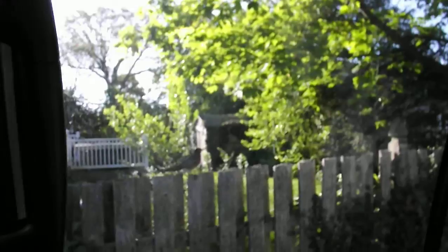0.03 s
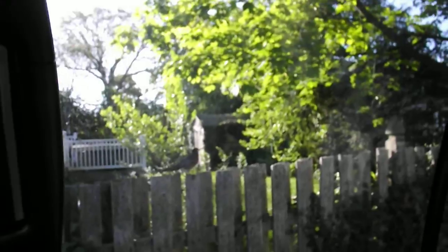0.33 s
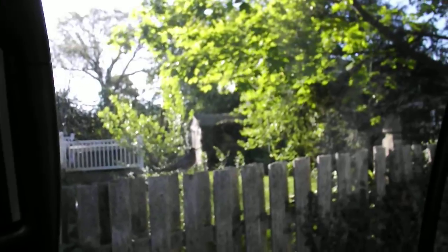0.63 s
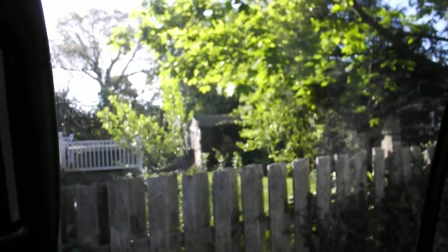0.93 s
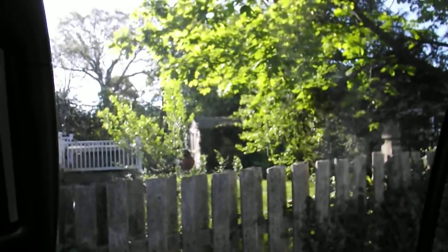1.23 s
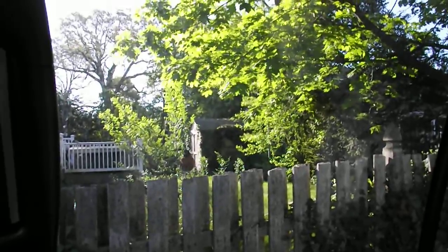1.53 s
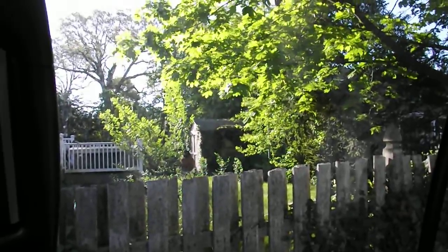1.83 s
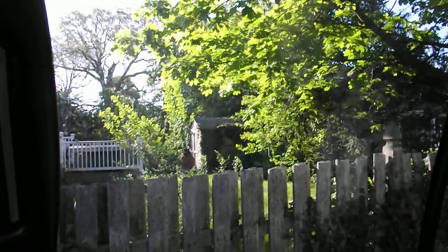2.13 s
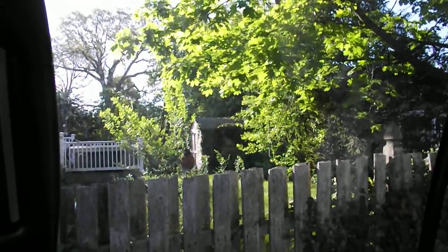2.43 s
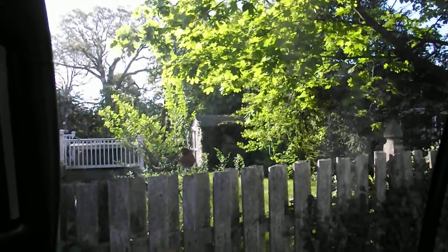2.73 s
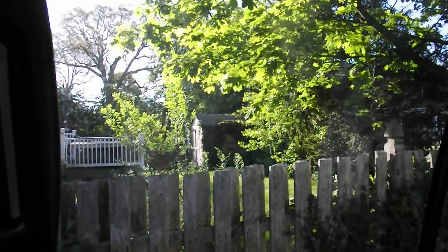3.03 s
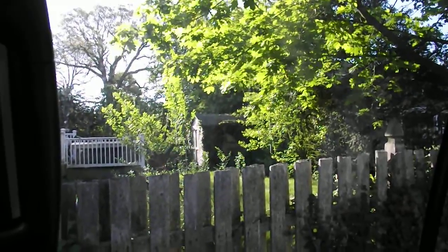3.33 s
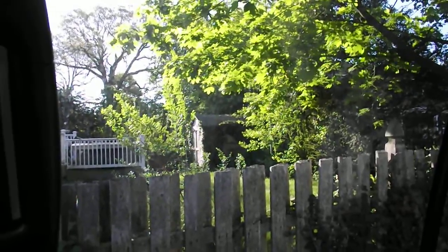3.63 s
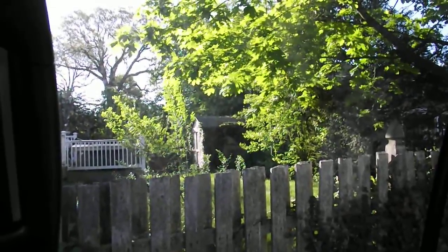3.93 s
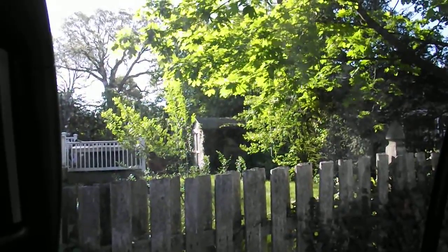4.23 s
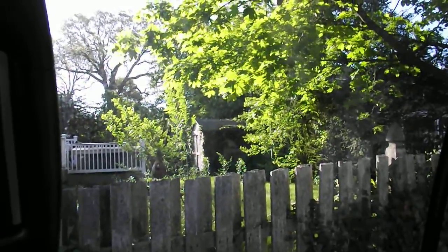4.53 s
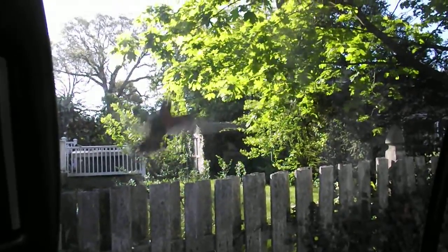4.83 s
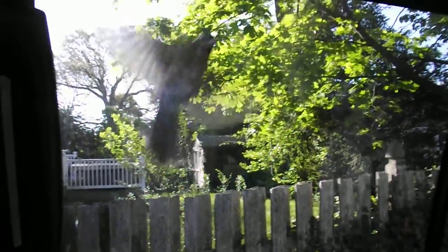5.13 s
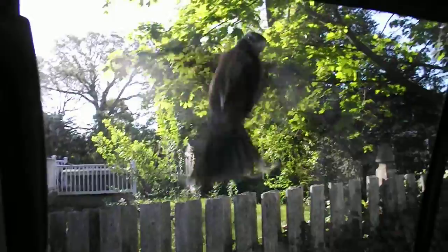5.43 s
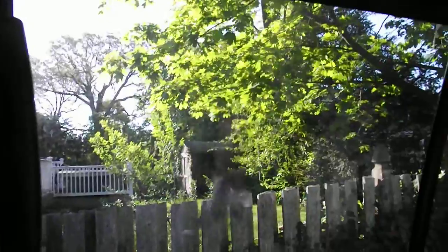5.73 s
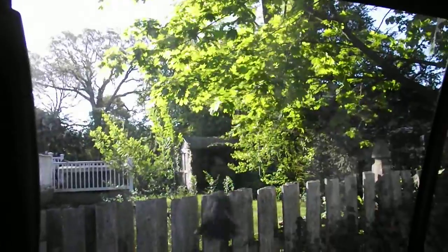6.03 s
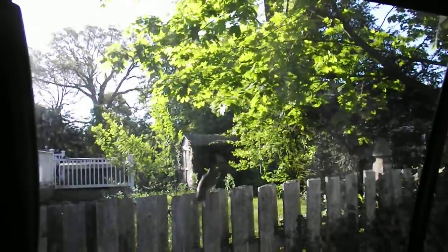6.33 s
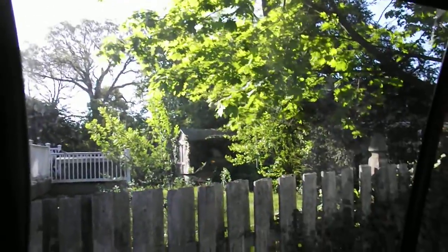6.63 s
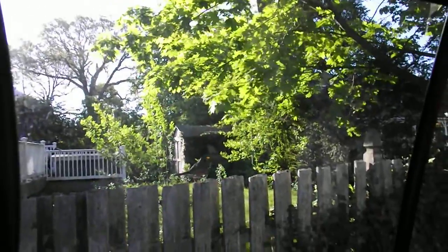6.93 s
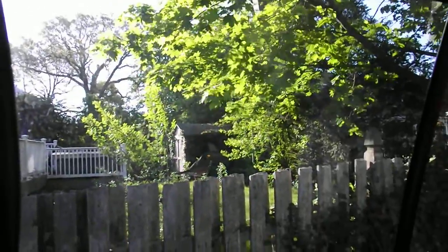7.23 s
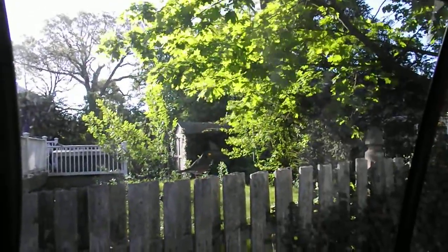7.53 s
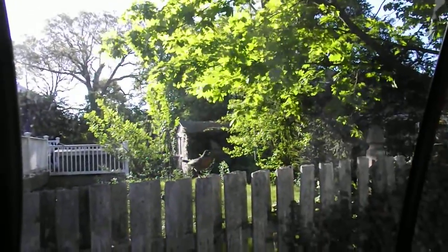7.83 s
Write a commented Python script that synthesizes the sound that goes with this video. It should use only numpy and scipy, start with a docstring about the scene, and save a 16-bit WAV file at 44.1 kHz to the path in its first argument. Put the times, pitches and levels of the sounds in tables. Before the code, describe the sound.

A bird thumps a car window once and briefly scratches down the glass, over a low idling engine and faint handling clicks.

```python
"""A bird flies into the window of a parked car, heard from inside: it thumps the pane once and slides
down the glass, its feathers scratching and squeaking with each wingbeat. A six-cylinder engine idles
throughout, three firings a turn booming in the cabin, its speed hunting a little under a faint fan hiss.
The plastic case of a hand-held camera creaks, clicks and knocks faintly, and a sleeve rustles."""
import sys
import numpy as np
from scipy import signal
from scipy.fft import rfft, irfft
from scipy.io import wavfile
from scipy.ndimage import uniform_filter1d

SR = 44100
rng = np.random.default_rng(int(sys.argv[2]) if len(sys.argv) > 2 else 0)


def inscribe(sig):
    """Save sig as 16-bit PCM at rate SR to the path in sys.argv[1].

    A 1-D sig is mono; a 2-D sig holds one channel per row.
    Samples are clipped to [-1, 1] before scaling.
    """
    pcm = np.round(np.clip(np.atleast_2d(sig).T, -1, 1) * 32767)
    wavfile.write(sys.argv[1], SR, pcm.astype(np.int16))


N = 347067
T = np.arange(N) / SR


def amp(db):
    """Decibels to gain."""
    return 10 ** (np.asarray(db) / 20)


def unit(x):
    """Scale to rms 1."""
    return x / np.sqrt(np.mean(x ** 2))


def colour(x, outline):
    """Filter by a (Hz, dB) outline, falling steeply beyond its ends."""
    hz, db = np.transpose(outline)
    log_hz = np.log(np.maximum(np.fft.rfftfreq(len(x), 1 / SR), 1))
    beyond = np.maximum(log_hz - np.log(hz[-1]), 0) + np.maximum(np.log(hz[0]) - log_hz, 0)
    return irfft(rfft(x) * amp(np.interp(log_hz, np.log(hz), db) - 69 * beyond), len(x))


def noise(outline):
    """Coloured noise of rms 1."""
    return unit(colour(rng.standard_normal(N), outline))


def walk(rate_hz):
    """Smooth random drift of rms 1."""
    hold = int(SR / rate_hz)
    steps = np.repeat(rng.standard_normal(N // hold + 1), hold)
    return unit(uniform_filter1d(uniform_filter1d(steps, hold), hold)[:N])


def swell(middle_s, length_s):
    """Bell-shaped envelope."""
    return np.exp(-np.minimum((2 * (T - middle_s) / length_s) ** 2, 20))


def swells(rows):
    """Summed envelope of (middle s, length s, dB) bursts."""
    return sum(amp(db) * swell(middle_s, length_s) for middle_s, length_s, db in rows)


def add(out, start_s, x):
    """Mix x into out."""
    i = int(start_s * SR)
    out[i:i + len(x)] += x[:N - i]


def resonate(x, modes):
    """Pass x through parallel (Hz, width Hz, dB) resonances of alternating sign."""
    return sum((-1) ** k * amp(db) * signal.lfilter(*signal.iirpeak(hz, hz / width_hz, fs=SR), x)
               for k, (hz, width_hz, db) in enumerate(modes))


# Spectra of fan air and fine hiss. Each row: frequency in Hz, relative density in dB.
AIR_SPECTRUM = [(100, 0.5), (170, 2), (270, 0.5), (330, -6), (420, -6.5), (640, -15), (860, -21),
                (1250, -20), (1900, -16.5), (2150, -16), (2420, -9), (2700, -15), (2950, -15), (3600, -25),
                (4800, -35)]
HISS_SPECTRUM = [(2500, -12.5), (5000, -1), (8000, -0.5), (12000, -1.5), (16000, -5.5)]
# Duct resonances. Each row: frequency in Hz, width in Hz, relative gain in dB.
DUCT_MODES = [(278, 14, 7.5), (603, 24, -1.5), (693, 40, -6.5), (1050, 110, -13), (1355, 36, -8),
              (1576, 36, -11), (1858, 100, -4.5), (2396, 58, 2.5), (2610, 51, -8.5), (2870, 70, -2.5),
              (3130, 110, -8), (3480, 130, -16), (3797, 57, -12), (4380, 250, -20.5), (5970, 320, -25.5)]


def fan(air_db=-45.5, waver_db=0.75, duct_db=-52, hiss_db=-63.5):
    """Fan air rushes and sings in the ducts, with a fine hiss on top."""
    air = noise(AIR_SPECTRUM) * amp(air_db + waver_db * walk(15))
    duct = unit(resonate(rng.standard_normal(N), DUCT_MODES)) * amp(duct_db)
    return air + duct + noise(HISS_SPECTRUM) * amp(hiss_db)


# Swells of the rush. Each row: middle in seconds, length in seconds, level in dB.
RUSH_SWELLS = [(3.72, 0.86, -56), (5.85, .4, -75)]
# Its spectrum. Each row: frequency in Hz, relative density in dB.
RUSH_SPECTRUM = [(400, -5), (600, -2.5), (720, -4.5), (795, 2.5), (870, -9.5), (1100, -12)]


def hollow_rush(rest_db=-72.5):
    """A soft hollow rush swells and fades."""
    return noise(RUSH_SPECTRUM) * (amp(rest_db) + swells(RUSH_SWELLS))


# Body shake and cabin rumble. Each row: frequency in Hz, relative density in dB.
RUMBLE_SPECTRUM = [(4, -17.5), (9, -7.5), (14, -16), (19, 5.5), (27, -27), (40, -14), (60, -18),
                   (80, -15.5), (110, -28.5), (160, -46.5), (250, -60)]


def body_rumble(level_db=-25, surge_db=0.5, shake_top_hz=30):
    """The car body rumbles; its deepest shake comes in surges."""
    rumble = noise(RUMBLE_SPECTRUM) * amp(level_db)
    shake = signal.sosfilt(signal.butter(1, shake_top_hz, fs=SR, output="sos"), rumble)
    return rumble + shake * (amp(surge_db * walk(4)) - 1)


# Idle sags. Each row: middle in seconds, length in seconds, crank speed lost in Hz.
IDLE_SAGS = [(1.324, 1.02, 1.75), (3.643, .82, 1.65), (5.525, 0.753, 0.758), (7.099, 2, 1)]
# Engine tones. Each row: multiple of crank speed, relative level in dB, dB added per Hz above mean speed.
ENGINE_ORDERS = [(1, -3, 2.5), (2, -16.5, 9.5), (3, 1, 0), (4, -16.5, -3), (5, -30.5, -1.5), (6, -32, -1.5),
                 (7, -50, 4.5), (8, -37.5, 2.5), (12, -44.5, -0.5)]


def engine(idle_hz=24.37, boom_db=-17, boom_db_per_hz=0.77, pulley_ratio=4 / 3, lurch_rad=0.0099):
    """Firing, unbalance and belt pulley tones boom in the cabin, louder as the idle speeds up."""
    crank_hz = idle_hz - sum(loss_hz * swell(s, length_s) for s, length_s, loss_hz in IDLE_SAGS)
    above_hz = crank_hz - crank_hz.mean()
    burn = walk(24)  # each turn burns stronger or weaker and nudges the crank
    crank_rad = 2 * np.pi * np.cumsum(crank_hz) / SR + lurch_rad * burn
    pulley_rad = pulley_ratio * crank_rad
    tones = amp(-18 + 2 * walk(3.4)) * np.sin(pulley_rad)
    tones += amp(-24 + 2 * walk(3.2)) * np.sin(2 * pulley_rad)  # throbs against the firing tone
    for order, db, db_per_hz in ENGINE_ORDERS:
        tone_db = db + db_per_hz * above_hz + 0.38 * walk(11)
        tones += amp(tone_db) * np.sin(order * crank_rad + rng.uniform(0, 2 * np.pi))
    level_db = boom_db + boom_db_per_hz * above_hz + 0.17 * burn + 0.5 * walk(4.79)
    return np.sqrt(2) * tones * amp(level_db)


# Sleeve rustles. Each row: middle in seconds, length in seconds, gain in dB.
RUSTLES = [(2.688, 0.024, -43), (3.682, 0.057, -48.5), (3.995, 0.085, -51), (4.51, 0.065, -46),
           (7.64, 0.055, -52)]
# Cloth spectrum. Each row: frequency in Hz, relative density in dB.
CLOTH_SPECTRUM = [(1000, -11), (2000, -3), (3000, 7.5), (3600, -11), (4100, -5.5), (4700, -16), (7000, -23),
                  (12000, -35.5)]


def sleeve(grain_db=3):
    """Cloth slides softly as the arm shifts."""
    return swells(RUSTLES) * noise(CLOTH_SPECTRUM) * amp(grain_db * (walk(500) - 0.5))


# Camera case resonances. Each row: frequency in Hz, width in Hz, gain in dB.
CASE_MODES = [(214, 31, 4.5), (292, 76, -0.5), (694, 100, -10), (925, 70, -7.5), (1130, 96, -5),
              (1390, 200, -3), (1980, 370, -3.5), (2320, 223, 4.5), (3000, 336, 6.5), (3155, 600, 0)]


def camera_case(force):
    """The plastic case rings under a force."""
    return resonate(force, CASE_MODES)


def judder(bursts, tilt_db, slip_rate_hz=2200, scatter_db=1, rub=0.13):
    """Dense little slips jolt the case in (middle s, length s, dB) bursts; negative tilt dulls them."""
    t, out = T[:SR // 4], np.zeros(N)
    centre_s = t[-1] / 2
    outline = [(170, 0), (600, 0), (3300, 2.5 * tilt_db),
               (5000, 3 * tilt_db - 6), (16000, 3 * tilt_db - 12)]
    for middle_s, length_s, db in bursts:
        pressure = np.exp(-(2 * (t - centre_s) / length_s) ** 4)
        slips = (rng.random(len(t)) < slip_rate_hz / SR) * amp(scatter_db * rng.standard_normal(len(t)))
        force = pressure * (slips - slips.mean() + rub * rng.standard_normal(len(t)))
        body = unit(colour(camera_case(force), outline))
        add(out, middle_s - centre_s, amp(db) * body * np.sqrt(np.mean(pressure ** 2)))
    return out


# Soft knocks. Each row: middle in seconds, length in seconds, level in dB.
KNOCKS = [(.8215, 0.0035, -39), (.8855, 0.0042, -34.5), (.894, 0.0034, -34), (.956, 0.011, -39),
          (.99, .01, -35), (1.021, 0.017, -35.5), (1.081, 0.014, -37), (1.183, 0.014, -40),
          (1.2535, 0.0075, -34.5), (1.3195, 0.01, -34), (1.333, 0.0066, -36), (1.3885, 0.0061, -35)]


def camera_knocks():
    """Dull judders inside the camera, like a lens stepping into focus."""
    return judder(KNOCKS, tilt_db=-9)


# Grip creaks. Each row: middle in seconds, length in seconds, level in dB, relative grit level in dB.
CREAKS = [(0.643, 0.017, -42, -6.5), (0.95, 0.014, -37.5, -16), (0.9824, .005, -37, -14),
          (0.986, 0.0051, -32, -19), (1.012, 0.013, -35, -15), (1.024, 0.011, -29.5, -19),
          (1.1085, 0.0099, -35, -19)]
# Rubbing plastic. Each row: frequency in Hz, relative density in dB.
GRIT_SPECTRUM = [(3000, -1), (4000, 5), (4900, -14), (6800, -15), (8000, -22), (10000, -19), (12000, -29)]


def grip_creaks():
    """The grip sticks and slips on the plastic, with a little grit on top."""
    body = judder([(s, length_s, db) for s, length_s, db, _ in CREAKS], tilt_db=-0.5)
    grit_gain = swells([(s, length_s, db + grit_db) for s, length_s, db, grit_db in CREAKS])
    return body + grit_gain * noise(GRIT_SPECTRUM)


# Camera clicks. Each row: start in seconds, level over the first 5 ms in dB, ring in Hz, its t60 in
# seconds, ring and edge gains in dB re twice the snap's peak, snap's low cutoff as a share of ring Hz.
CLICKS = [(0.1645, -33, 1700, .026, -12, -33, 0.25), (.186, -48, 1800, 0.018, -15, -24, .3),
          (0.82, -41.5, 1450, .015, -12, -30, .15), (0.991, -29.5, 3080, .012, -18, -24, .25),
          (1.012, -28.5, 3020, .014, -12, -23, .3), (1.0203, -28.5, 2360, 0.015, -10, -25, 0.28),
          (1.0262, -28, 2900, 0.016, -11, -26, 0.28), (1.032, -33, 3060, .012, -8, -25, 0.27),
          (1.0956, -30.5, 2100, .013, -14, -30, .15), (1.1143, -36, 2400, .015, -15, -26, 0.37),
          (1.1342, -38.5, 2300, .015, -14, -22, .4), (1.2877, -37, 1720, .02, -6, -30, .4),
          (1.3048, -30, 2360, .017, -10, -10, 0.14), (1.331, -22.5, 2350, 0.022, -4, -11.5, 0.11),
          (2.678, -47, 3600, .01, -16, -9, 0.72), (2.9427, -24.5, 2430, 0.03, -13, -24, 0.61),
          (3.391, -38.5, 1130, 0.016, -20, -22, 0.44), (3.961, -44.5, 2220, .02, -10, -28, .35),
          (4.4805, -41, 2210, 0.018, -13, -16, .7), (4.6252, -44, 3420, .012, -12, -11, 0.41),
          (4.675, -49, 1010, .02, -15, -22, .55), (4.841, -43, 2940, 0.014, -18, -15, 0.19)]
# Hard edge of a snap. Each row: frequency in Hz, relative density in dB.
EDGE_SPECTRUM = [(3000, 2), (4000, 1), (4800, 5.5), (6500, -2), (8500, -7.5), (11000, -17), (15000, -20.5)]


def camera_clicks(rattle_t60_s=0.017, edge_t60_s=0.0056, rise_s=0.00071, bend=0.48, bend_s=0.00064):
    """A hard-edged snap rattles through the case; the treble arrives first, then one part rings."""
    t, out = T[:SR // 16], np.zeros(N)
    impulse = t == 0
    bent_s = t + bend * bend_s * (1 - np.exp(-t / bend_s))  # the ring starts sharp
    for start_s, db, hz, t60_s, ring_db, edge_db, low_share in CLICKS:
        jolt = impulse + 0.12 * rng.standard_normal(len(t)) * amp(-60 * t / rattle_t60_s)
        band = signal.butter(2, [low_share * hz, 1.6 * hz], "band", fs=SR, output="sos")
        snap = signal.sosfilt(band, camera_case(jolt))
        ring = amp(ring_db - 60 * t / t60_s) * (1 - np.exp(-t / rise_s)) * np.sin(2 * np.pi * hz * bent_s)
        spike = impulse + 0.3 * rng.standard_normal(len(t)) * amp(-60 * t / edge_t60_s)
        edge = colour(np.roll(spike, SR // 4000), EDGE_SPECTRUM)
        click = snap / np.abs(snap).max() + 2 * ring + 2 * amp(edge_db) * edge / np.abs(edge).max()
        add(out, start_s, amp(db) * click / np.std(click[:SR // 200]))
    return out


# Thin whistles. Each row: middle in seconds, length in seconds, pitch in Hz, level in dB.
WHISTLES = [(1.13, .07, 9900, -70), (1.553, 0.1, 3030, -54), (5.436, 0.01, 2920, -36),
            (5.452, .006, 2830, -39), (5.528, 0.02, 2840, -40), (5.545, 0.0071, 2840, -40),
            (5.86, 0.12, 665, -57.5), (6.545, .08, 1095, -59)]


def whistles(waver=0.02):
    """Short, unsteady whistles; those during the bird's slide are heard as squeaks."""
    rad_per_hz = 2 * np.pi * np.cumsum(1 + waver * walk(280)) / SR
    return sum(np.sqrt(2) * amp(db) * swell(middle_s, length_s) * np.sin(hz * rad_per_hz)
               for middle_s, length_s, hz, db in WHISTLES)


# Ticks on the glass. Each row: start in seconds, level in dB, centre in Hz, t60 in seconds.
TICKS = [(5.3628, -48, 6000, .008), (5.3655, -37, 3200, .01), (5.3662, -46, 9500, .016),
         (5.3826, -48, 5500, .009), (5.3868, -37, 6000, .003), (5.4352, -40, 2500, 0.011),
         (5.4482, -39, 2500, .01), (5.5030, -30, 1550, 0.0095)]


def beak_and_claws(width_share=0.58):
    """Each hard tip meets the glass with a tiny burst of treble."""
    t, out = T[:SR // 50], np.zeros(N)
    for start_s, db, hz, t60_s in TICKS:
        tip = [(hz, width_share * hz, 0)]
        burst = unit(resonate(resonate(rng.standard_normal(len(t)), tip), tip))
        add(out, start_s, amp(db - 60 * t / t60_s) * burst)
    return out


# Wing strokes and feather-tip flicks. Each row: middle in seconds, length in seconds, level in dB.
WING_STROKES = [(5.398, .014, -49), (5.442, 0.026, -45), (5.535, 0.04, -50)]
TIP_FLICKS = [(5.402, .016, -59), (5.56, .007, -53), (5.568, 0.0069, -54)]
# Their spectra. Each row: frequency in Hz, relative density in dB.
FEATHER_SPECTRUM = [(500, 3), (1200, -11), (2300, 4.5), (2950, 5.5), (3700, -6.5), (4800, -14), (6000, -25),
                    (8000, -35), (15000, -34)]
FLICK_SPECTRUM = [(3000, -3), (4200, 2), (5200, -7), (6000, -1), (6800, -8), (7500, -11), (9000, -14)]


def feathers(start_s=5.385, end_s=5.565, release_s=0.0091, slide_db=-42.5, fade_db_per_s=25,
             crush_s=0.0043, crush_lead_s=0.00032, grain_db=2.2):
    """Feathers crush at each blow, slide down the glass, scratch harder at each wingbeat and flick off."""
    crush = swells([(s - crush_lead_s, crush_s, -20 + 0.51 * db) for s, db, _ in BLOWS])
    age_s = np.maximum(T - start_s, 0)
    gate = (age_s > 0) * np.clip((end_s - T) / release_s, 0, 1)
    slide = amp(slide_db - fade_db_per_s * age_s) * gate
    grain = rng.standard_normal(N) * amp(grain_db * walk(400))
    scratch = unit(colour(grain, FEATHER_SPECTRUM))
    flicks = swells(TIP_FLICKS) * noise(FLICK_SPECTRUM)
    return (crush + slide + swells(WING_STROKES)) * scratch + flicks


# Blows within the one thump. Each row: start in seconds, gain in dB, contact time in seconds.
BLOWS = [(5.3686, -15.5, 0.00018), (5.3826, -37.5, .00005), (5.388, -47, .00002)]
# Window modes. Each row: frequency in Hz, relative level in dB, t60 in seconds.
PANE_MODES = [(224, -7.5, 0.091), (332, -0.5, 0.057), (382, -8, 0.053), (503, 3, 0.049), (570, -3, 0.044),
              (688, -3.5, 0.048), (830, -11, 0.062), (980, -14, .03), (1150, -14, 0.03), (1446, -7, 0.037),
              (1810, -4.5, 0.025), (1990, -1, 0.018), (2430, -11, 0.015), (2700, -6, 0.024),
              (3400, -9, 0.025), (4300, -14, 0.022)]
# Contact crack. Each row: frequency in Hz, relative density in dB.
CRACK_SPECTRUM = [(1250, 3), (2100, 5), (3200, 0), (4600, -3), (6300, -18), (9000, -16), (15000, -24)]


def window_thump(crack_db=-11, crack_t60_s=0.039, lag_s=0.00182, rise_s=0.00018, low_cut_hz=120):
    """The bird's body hits with a crack and pushes the pane's low modes in together; high ones follow."""
    t, out = T[:SR // 4], np.zeros(N)
    pane = amp(crack_db - 60 * t / crack_t60_s) * noise(CRACK_SPECTRUM)[:len(t)]
    for hz, db, t60_s in PANE_MODES:
        is_high = hz > 1000
        age_s = np.maximum(t - lag_s * is_high, 0)
        attack = 1 - np.exp(-age_s / rise_s) * is_high
        pane -= amp(db - 60 * age_s / t60_s) * np.sin(2 * np.pi * hz * age_s) * attack
    for start_s, db, contact_s in BLOWS:
        push = np.exp(-t[:SR // 100] * np.pi / contact_s)  # longer contact is duller
        add(out, start_s, amp(db) * np.convolve(pane, push / push.sum()))
    low_cut = signal.butter(2, low_cut_hz, "high", fs=SR, output="sos")  # a stiff pane gives no deep bass
    return signal.sosfilt(low_cut, out)


def scene():
    """Everything heard from the seat, in mono."""
    bird = window_thump() + beak_and_claws() + feathers()
    handling = camera_clicks() + grip_creaks() + camera_knocks() + sleeve()
    car = engine() + body_rumble() + fan()
    return (car + hollow_rush() + whistles() + handling + bird)[None]


def record(dry, fade_s=0.05, top_hz=15700):
    """Quick fade-in and a steep treble cut."""
    fade_in = np.sin(np.pi / 2 * np.minimum(T / fade_s, 1)) ** 2
    return signal.sosfilt(signal.ellip(10, 0.1, 80, top_hz, fs=SR, output="sos"), dry * fade_in)


dry = scene()
out = record(dry)
inscribe(out)
```